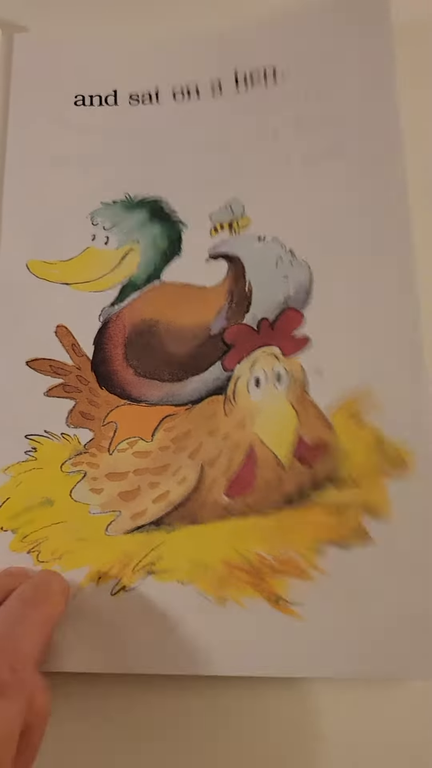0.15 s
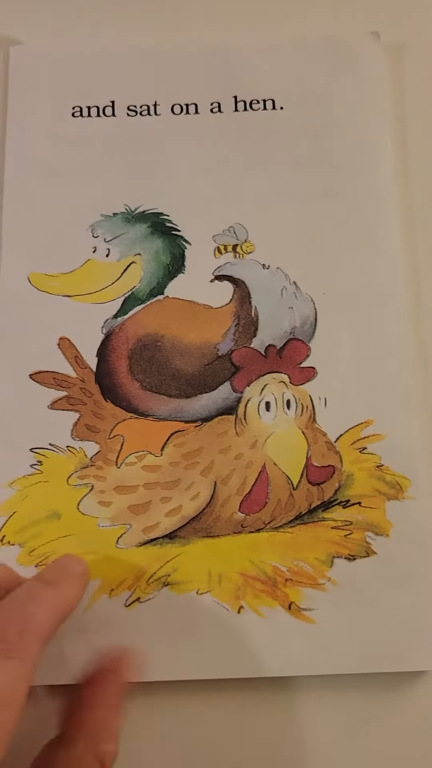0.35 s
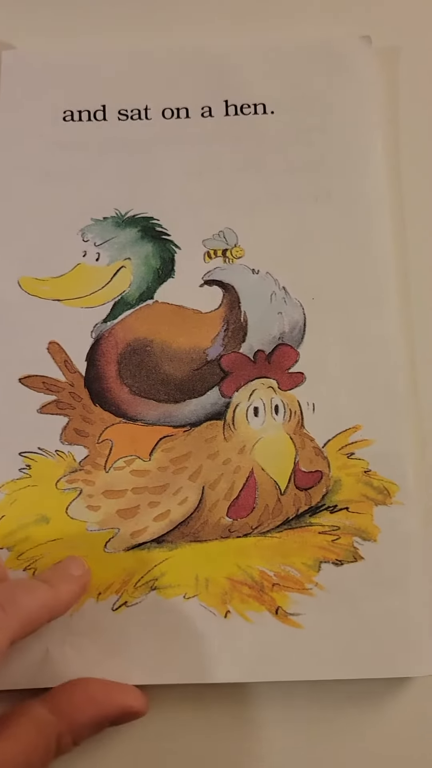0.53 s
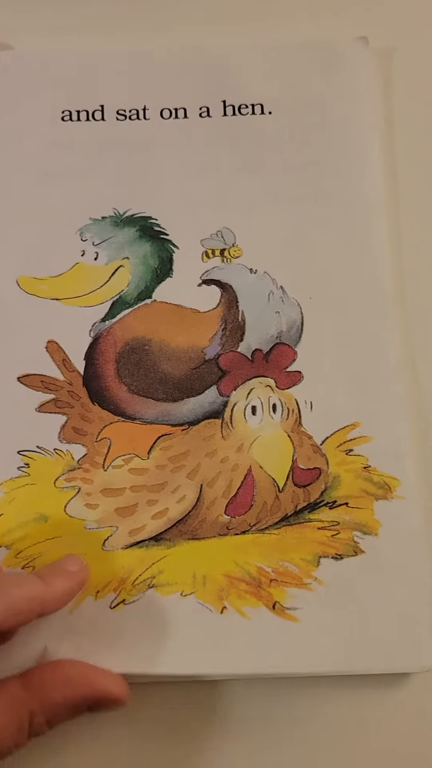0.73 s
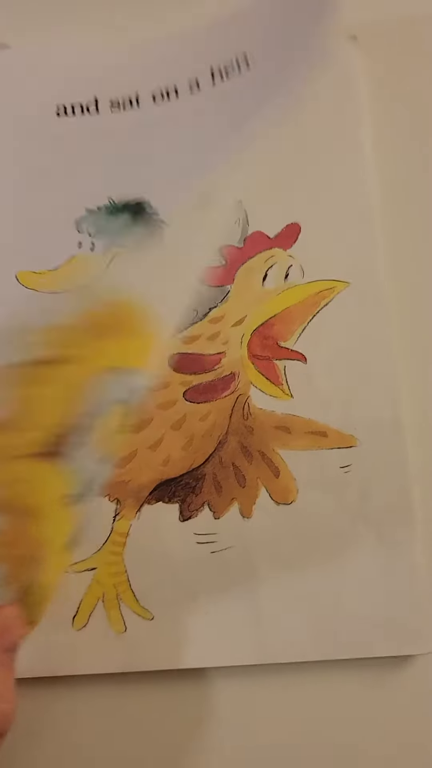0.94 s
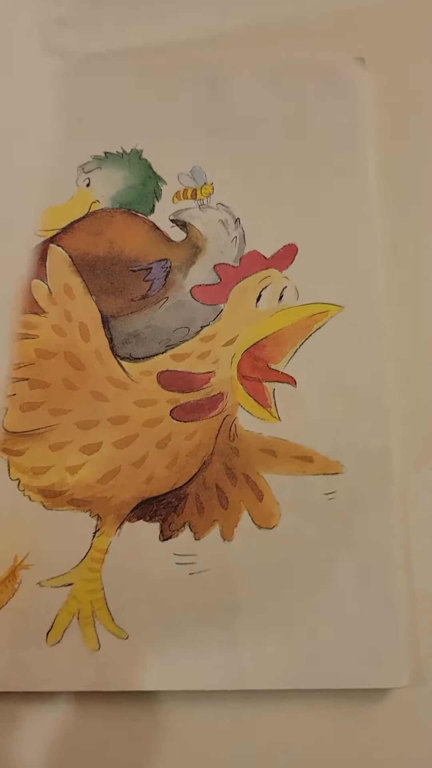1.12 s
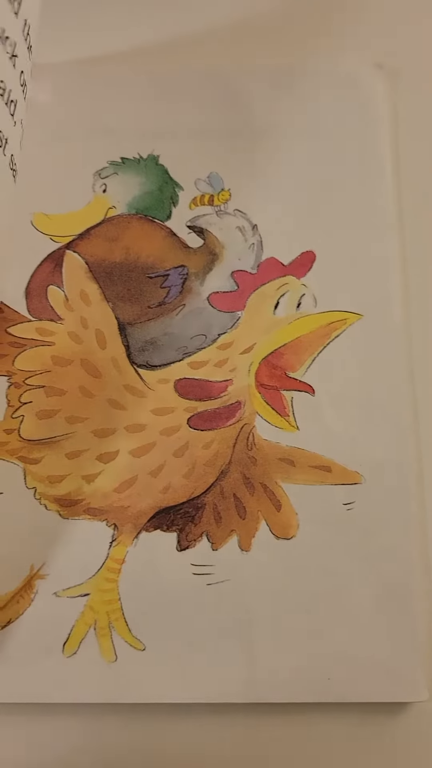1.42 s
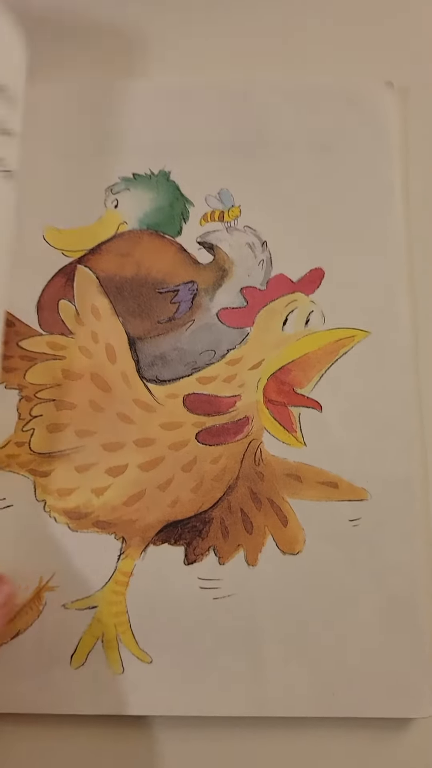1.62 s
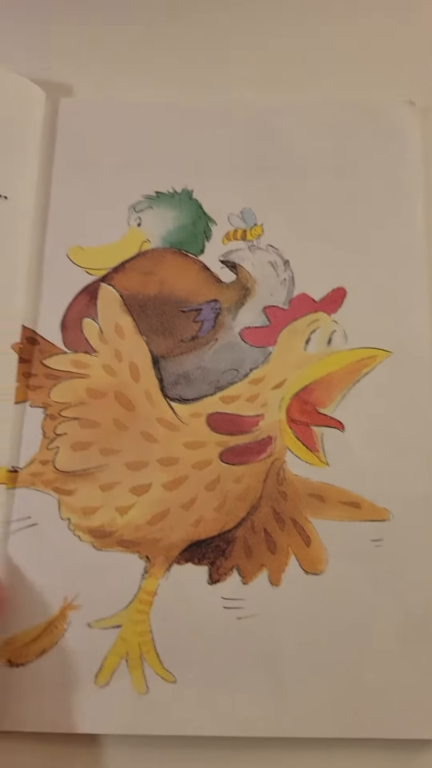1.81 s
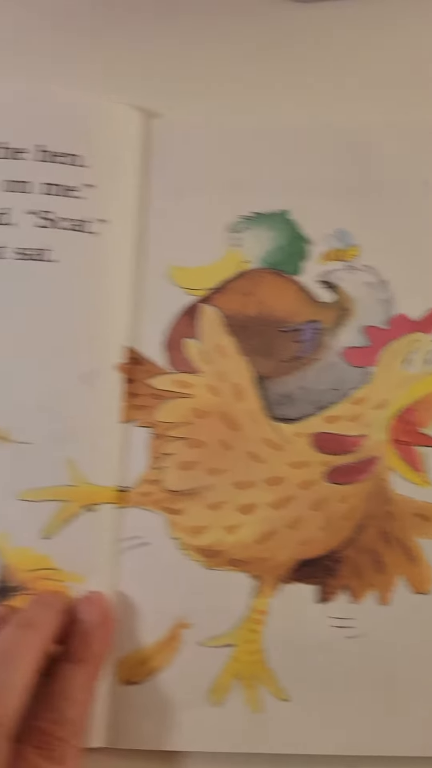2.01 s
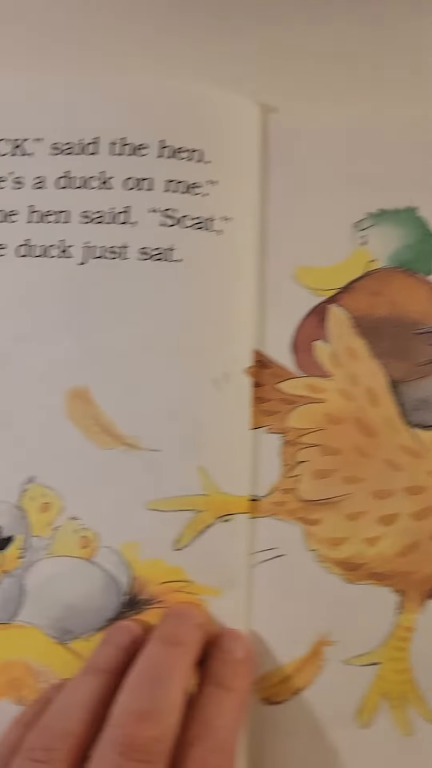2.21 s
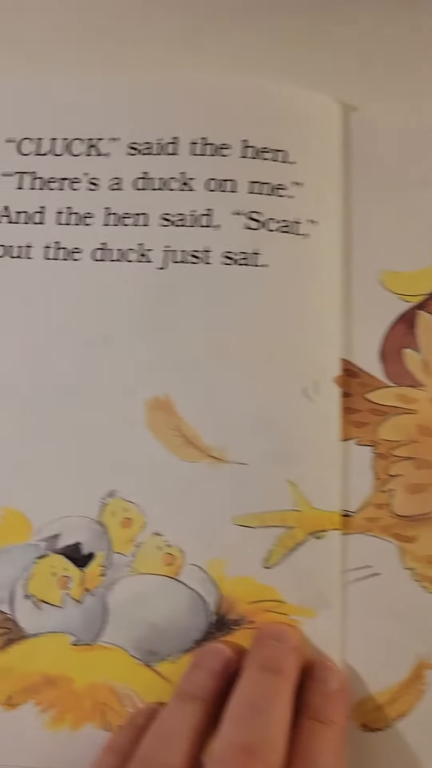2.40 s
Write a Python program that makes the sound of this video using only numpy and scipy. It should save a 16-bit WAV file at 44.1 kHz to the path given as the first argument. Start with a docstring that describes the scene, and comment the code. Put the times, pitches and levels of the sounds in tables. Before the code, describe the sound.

Close stereo page turn in a small room with low rumble: the corner flicks free sharply, paper slides and buckles, the sheet slaps down on the book, and a few faint taps follow.

```python
"""A stiff page of a picture book is turned by hand, close to the microphone in a small quiet room.
The corner snaps free and the sheet rings; the page lands in a run of slaps and the book rings under it.
Bending paper pops in broad bands of noise and knocks in short dying tones.
Rubbing and sliding are tiny grains mixed with hiss. Echoes and a short tail make the room;
low rumble and faint hiss lie behind it all."""
import sys
import numpy as np
from scipy import signal
from scipy.fft import rfft, irfft
from scipy.io import wavfile
from scipy.ndimage import uniform_filter1d

SR = 44100
rng = np.random.default_rng(int(sys.argv[2]) if len(sys.argv) > 2 else 0)


def dump_mix(stems):
    """Bounce the given channels to the path in sys.argv[1] as a 16-bit WAV at rate SR."""
    frames = np.atleast_2d(stems).T  # one column per channel
    limited = np.clip(frames, -1, 1)  # hard clip at full scale
    pcm = np.round(limited * 32767).astype(np.int16)
    wavfile.write(sys.argv[1], SR, pcm)


N = 112454  # length of the sound in samples
HZ = np.fft.rfftfreq(4096, 1 / SR)  # frequencies at which the short pulses are shaped


def amp(db):
    """Turns decibels into a gain."""
    return 10 ** (np.asarray(db) / 20)


def unit(x):
    """Scales a sound to an average energy of 1 per channel."""
    channels = len(np.atleast_2d(x))
    return x / np.sqrt(np.sum(x ** 2) / channels + 1e-20)


def read(points, hz):
    """Reads a table between its points, with pitch on a log scale."""
    f, value = np.transpose(points)
    return np.interp(np.log(hz + 1), np.log(f + 1), value)


def add(mix, s, sound):
    """Mixes a stereo sound in at time s, cut off at the end of the mix."""
    part = mix[:, max(round(s * SR), 0):][:, :sound.shape[1]]
    part += sound[:, :part.shape[1]]


def sides(pan_db):
    """Gains for left and right; a positive value makes the left louder."""
    return amp([[pan_db / 2], [-pan_db / 2]])


def causal(db):
    """Makes a pulse with this spectrum and its energy as early as possible (minimum phase)."""
    cepstrum = irfft(np.log(amp(np.maximum(db - db.max(), -90))))
    half = len(cepstrum) // 2
    # fold the backward half onto the forward half
    cepstrum[1:half] *= 2
    cepstrum[half + 1:] = 0
    return unit(irfft(np.exp(rfft(cepstrum)))[:half])


def through(x, response):
    """Passes a sound through a response, by convolution along time."""
    return signal.fftconvolve(np.atleast_2d(x), np.atleast_2d(response), axes=1)


def dying(t, t60):
    """Exponential decay that falls by 60 dB in t60 seconds."""
    return np.exp(-np.log(1000) * t / np.maximum(t60, 1e-4))


def ringing(modes):
    """Dying tones; the higher they are, the more their phase may differ between left and right."""
    t = np.arange(SR // 2) / SR
    total = 0
    for hz, db, t60 in modes:
        phase = rng.random() + min(hz / 2000, 1) * rng.random((2, 1))
        tone = np.sin(2 * np.pi * (hz * t + phase))
        total = total + amp(db) * unit(dying(t, t60) * tone)
    return total


def flutter(length_s):
    """Dense paper ringing: a dying noise burst, evened out in spectrum, alike on both sides in the bass."""
    mono_below_hz = 310  # around here the likeness has dropped to half
    t = np.arange(len(HZ) * 2) / SR
    z = rfft(rng.standard_normal((2, len(t))))
    same = 1 / (1 + (np.fft.rfftfreq(len(t), 1 / SR) / mono_below_hz) ** 2)
    z[1] = same * z[0] + np.sqrt(1 - same ** 2) * z[1]
    burst = irfft(z) * dying(t, length_s)
    for _ in range(2):
        even = irfft(np.exp(1j * np.angle(rfft(burst))))  # keep the phases, flatten the spectrum
        burst = even * dying(t, 2 * length_s)
    return unit(burst)


def snap(pulse, db, ring_s, pan_db, lag_s, click_db):
    """One sudden release: a click and the sheet's short ringing, arriving on the left first."""
    burst = amp(1) * flutter(ring_s)  # ringing raised by 1 dB
    burst[:, 0] += amp(click_db) * np.exp(-ring_s / 0.038)  # a longer ring has a weaker click
    left, right = through(burst, pulse)
    late_right = np.roll(right, round(abs(lag_s) * SR))
    sound = np.array([unit(left), unit(late_right)])
    return amp(db) * unit(sound * sides(pan_db))


# The corner snapping free: (time [s], level [dB], ring length setting [s], left over right [dB])
CORNER_SNAPS = [(.249, 7.5, 0.0099, 2), (0.2523, 11.5, 0.018, -4.5), (0.2562, 6, 0.008, -4),
                (0.2716, -4, .005, -1.5)]
# Tone colour of those snaps: (frequency [Hz], level [dB])
CORNER_COLOUR = [(60, -49.5), (120, -37), (300, -26.5), (600, -28.5), (830, -17), (1100, -8), (1250, -12),
                 (1800, -9.5), (2100, -11), (2600, -1.5), (3200, -10), (4500, -11), (7900, -14.5),
                 (10700, -27.5), (13200, -24.5), (16000, -33)]
# Tones of the flicked sheet: (frequency [Hz], level [dB], time to fall 60 dB [s])
SHEET_TONES = [(1260, -6, 0.11), (1508, -3, 0.05), (2285, -4, 0.033), (2613, 1, 0.054), (3460, -1.5, 0.074)]


def corner():
    """The corner slips off the finger in a few snaps, and the sheet rings from the first one."""
    out = np.zeros((2, N))
    pulse = causal(read(CORNER_COLOUR, HZ))
    for s, db, ring_s, pan_db in CORNER_SNAPS:
        add(out, s, snap(pulse, db, ring_s, pan_db, lag_s=.00042, click_db=-5.5))
    add(out, CORNER_SNAPS[0][0], ringing(SHEET_TONES))
    return out


# The page landing, first its belly, then its edge in a run of crackles:
# (time [s], level [dB], ring length setting [s], left over right [dB])
PAGE_SLAPS = [(1.6359, -5.5, 0.007, 4), (1.6397, 0, 0.0055, 0.5), (1.6452, -1, 0.0074, 0.5),
              (1.648, 2.5, 0.016, 4.5), (1.6543, 2, .012, -0.5), (1.6605, -0.5, .02, -3.5),
              (1.6662, -2, .016, -1.5), (1.6734, -3, .018, 0.5), (1.678, -5.5, .02, -1.5),
              (1.6845, -8, .04, 0), (1.703, -14.5, 0.03, -2), (1.716, -26, 0.04, -7)]
# Tone colour of the slaps: (frequency [Hz], level [dB])
PAGE_SLAP_COLOUR = [(30, -25.5), (60, -6.5), (130, -1), (200, -8), (300, -2.5), (395, -9), (500, -1),
                    (800, 1), (1350, -0.5), (1900, -3), (2300, -12), (3300, -10.5), (4500, -23.5),
                    (7500, -25.5), (11000, -39.5), (14000, -35), (16000, -39.5)]
# Tones of the open book under the slap: (frequency [Hz], level [dB], time to fall 60 dB [s])
BOOK_TONES = [(295, -8, 0.0905), (443.8, -11, 0.13), (866, -14, .16), (1105, -6, 0.11), (1435, -1.5, 0.13),
              (1824, 1.5, 0.13), (2420, -9.5, .12), (3380, -7, 0.05)]


def landing():
    """The page meets the stack in a quick run of slaps, and the book rings from the fourth one."""
    out = np.zeros((2, N))
    pulse = causal(read(PAGE_SLAP_COLOUR, HZ))
    for s, db, ring_s, pan_db in PAGE_SLAPS:
        add(out, s, snap(pulse, db, ring_s, pan_db, lag_s=.00003, click_db=-0.5))
    add(out, PAGE_SLAPS[3][0], ringing(BOOK_TONES))
    return out


PAPER_LAG_S = .00032  # how much later pops and slides reach the right side

# The paper buckling and being tapped:
# (time [s], level [dB], low edge [Hz], high edge [Hz], fall below [dB/octave], fall above [dB/octave],
#  ring length setting [s], left over right [dB])
PAPER_POPS = [(.1145, -19, 600, 1300, 2, 12, 0.009, 9), (0.123, -21, 270, 400, 4, 8, 0.02, 2.5),
              (0.144, -18.5, 230, 300, 5, 10, 0.022, 6), (0.164, -23, 100, 200, -2.5, 5.5, 0.02, 0),
              (0.52, -20, 1500, 2200, 1.5, 42, 0.0025, 3), (0.645, -26.5, 1050, 1600, 28, 14, 0.06, 8),
              (0.74, -31, 650, 1000, 14, 10.5, 0.06, 7), (0.849, -36, 1100, 1300, 48, 45, 0.031, 22),
              (1.114, -5.5, 700, 1300, 9, 7.5, 0.009, 1.5), (1.127, -14, 420, 900, 10, 4.5, 0.06, 3),
              (1.161, -11.5, 380, 750, 5, 7, 0.015, -2.5), (1.2095, -6, 1250, 1500, 3, 7.5, .006, 5),
              (1.239, -20, 900, 1600, 1, 8, 0.01, -2), (1.2611, -19, 1400, 2600, 2, 11, 0.0025, -1),
              (1.3066, -22, 613, 830, 6, 7, .007, 4), (1.417, -29, 1050, 1250, 22, 8, 0.1, 3.5),
              (1.652, 8, 2950, 3600, 15, 22, 0.014, -0.5), (1.712, -17, 200, 300, 12, 20, .06, 0),
              (1.816, -23, 280, 350, 11.5, 12, 0.03, -6.5), (2.111, -14, 1700, 3600, 1, 22, 0.001, 1),
              (2.1124, -15, 597, 2000, -0.5, 14.5, 0.0055, -4), (2.3129, -30, 1700, 2600, 3, 7, 0.004, 2)]
# Tone colour shared by the pops: (frequency [Hz], level [dB])
PAPER_POP_COLOUR = [(40, -4), (150, 3.5), (600, 0), (1500, 4.5), (3000, 4.5), (4500, -2), (7500, 3),
                    (10500, -2.5), (13500, -0.5), (16000, -1.5)]


def pops():
    """Each buckle or tap of the paper rings in a broad band of its own."""
    out = np.zeros((2, N))
    for s, db, low_hz, high_hz, below, above, ring_s, pan_db in PAPER_POPS:
        octaves_below = np.maximum(np.log2(low_hz / (HZ + 10)), 0)
        octaves_above = np.maximum(np.log2((HZ + 10) / high_hz), 0)
        fall = below * octaves_below + above * octaves_above
        pulse = causal(read(PAPER_POP_COLOUR, HZ) - fall)
        add(out, s, snap(pulse, db, ring_s, pan_db, PAPER_LAG_S, click_db=3.0))
    return out


# Hollow knocks of the bent sheet:
# (time [s], level [dB], pitch [Hz], time for the tone to fall 60 dB [s], left over right [dB])
SHEET_KNOCKS = [(0.0552, -22, 1297, 0.025, 12), (.9875, -8.5, 1154, 0.0039, 8.5),
                (1.1142, -10.5, 800, 0.019, 3), (2.312, -34.5, 1720, 0.025, -4)]


def knocks():
    """The bent sheet swings for a few dying cycles, with a faint scatter at the same pitch."""
    rise_s, scatter_db = .0004, -16
    out, t = np.zeros((2, N)), np.arange(len(HZ)) / SR
    for s, db, hz, t60, pan_db in SHEET_KNOCKS:
        cycles = np.sin(2 * np.pi * hz * t) * dying(t, t60) * (1 - np.exp(-t / rise_s))
        burst = amp(scatter_db) * flutter(2 * t60)
        burst[:, 0] += 1  # the direct knock
        add(out, s, amp(db) * unit(through(burst, cycles) * sides(pan_db)))
    return out


def wander(x):
    """The colour of a rub shifts in random patches of time and pitch as the contact moves."""
    patch_db = 3  # typical size of the shift
    z = signal.stft(x, nperseg=512)[2]
    field = rng.standard_normal(z.shape[1:])
    field = uniform_filter1d(field, size=6, axis=0)  # smooth over pitch
    field = uniform_filter1d(field, size=4, axis=1)  # smooth over time
    shifted = z * amp(patch_db * field / field.std())
    return signal.istft(shifted, nperseg=512)[1][:, :x.shape[1]]


# Paper sliding on skin and paper:
# (start [s], peak time [s], end [s], level at peak [dB], start level below peak [dB],
#  tilt [dB/octave], scrape pitch [Hz], scrape boost [dB])
PAPER_SLIDES = [(0, 0.08, 0.26, -52.5, 9, -1, 1700, 5), (0.113, 0.145, 0.18, -54, -4, 3.5, 1000, 2),
                (0.18, 0.198, 0.38, -47, 10, -1, 1300, 4), (0.229, .247, 0.35, -36.5, 10, 1.5, 3000, 5),
                (0.638, 0.70, .8, -51, 8, -1, 1150, 7), (0.842, 0.97, 1.06, -49.5, 16, -.5, 1700, 0),
                (1.03, 1.085, 1.135, -47.5, 14, -0.8, 750, 4), (1.118, 1.24, 1.36, -50, -2, -.5, 1300, 2),
                (1.279, 1.316, 1.473, -52.5, 4, 2.5, 750, -0.5),
                (1.454, 1.541, 1.665, -45, 16.5, 0.23, 800, 7),
                (1.722, 1.811, 1.877, -48.5, 3, 3.5, 6500, -2), (1.839, 1.939, 1.98, -62, 4, 2, 1700, 6),
                (1.962, 2.09, 2.15, -60, 8, -3.5, 1200, 4)]
# Tone colour shared by the slides: (frequency [Hz], level [dB])
PAPER_SLIDE_COLOUR = [(250, -12.5), (400, -11), (600, -8.5), (900, -5), (1500, 2.5), (2100, -5),
                      (2900, -3.5), (4600, -11), (7500, -9.5), (10700, -20.5), (13500, -21.5),
                      (16000, -19.5)]


def slides():
    """Fibres catch and slip in tiny grains, mixed with hiss, while a stroke changes level and dies."""
    grains_per_s, grain_spread_db, hiss_share = 2000, 4, 1
    release_db, touch_s = 26, 0.006  # drop from peak to end; fade-in at first contact
    scrape_octaves, bass_cut_hz = 0.25, 170
    out, t = np.zeros((2, N)), np.arange(SR // 2) / SR
    octave = np.log2(HZ + 10)
    for start, peak, end, db, rise_db, tilt, scrape_hz, scrape_db in PAPER_SLIDES:
        # grains at random moments, mostly small, pushing either way
        sizes = amp(grain_spread_db * np.minimum(rng.exponential(1, len(t)), 5))
        hits = rng.random(len(t)) < grains_per_s / SR
        grains = hits * rng.choice([-1, 1], len(t)) * sizes
        late_grains = np.roll(grains, round(PAPER_LAG_S * SR))
        hiss = unit(rng.standard_normal((2, len(t))))
        drive = unit(np.array([grains, late_grains])) + hiss_share * hiss

        colour = read(PAPER_SLIDE_COLOUR, HZ) + tilt * octave
        colour -= 12 * np.maximum(np.log2(bass_cut_hz) - octave, 0)  # bass falls 12 dB per octave
        colour += scrape_db * np.exp(-((octave - np.log2(scrape_hz)) / scrape_octaves) ** 2)
        rub = wander(through(drive, causal(colour))[:, :len(t)])

        now = start + t
        stroke_db = np.interp(now, [start, peak, end], [-rise_db, 0, -release_db])
        level = amp(db + stroke_db) * (now < end) * np.minimum(t / touch_s, 1)
        add(out, start, level * unit(rub) * np.sqrt(len(t)))
    return out * sides(1.2)


# Near surfaces: (delay [s], level [dB])
NEAR_ECHOES = [(.0034, -9.5), (.0075, -19), (.013, -19), (.023, -20)]
# How long the room rings: (frequency [Hz], time to fall 60 dB [s])
TAIL_TIMES = [(100, .35), (300, .35), (600, .27), (1200, .28), (3000, .26), (8000, .245), (16000, .21)]
# How loud the room rings: (frequency [Hz], level [dB])
TAIL_LEVELS = [(100, -10.5), (200, -8.5), (300, -3.5), (600, -6), (1000, -8), (3000, -7.5), (8000, -5.5),
               (16000, -9.5)]
# Low resonances of the room: (frequency [Hz], level [dB], time to fall 60 dB [s])
ROOM_TONES = [(293, -32.5, .34), (328, -34, .28)]


def room(x):
    """Echoes from table and body, early scatter, low tones and the short tail of a small room."""
    early_db, early_t60 = -6, .07
    t = np.arange(SR // 2) / SR
    # the tail: noise that dies at its own pace at each pitch
    hz, when, z = signal.stft(rng.standard_normal((2, len(t))), SR, nperseg=256)
    t60 = np.maximum(read(TAIL_TIMES, hz), .02)[:, None]
    even_energy = np.sqrt(2 * np.log(1000) / (t60 * SR))  # long and short tails carry equal energy
    z = z * dying(when, t60) * amp(read(TAIL_LEVELS, hz))[:, None] * even_energy
    tail = signal.istft(z, SR, nperseg=256)[1][:, :len(t)]
    response = tail * np.minimum(t / 0.028, 1)

    scatter = rng.standard_normal((2, len(t))) * dying(t, early_t60) * np.minimum(t / 0.0057, 1)
    response += amp(early_db) * unit(scatter)
    response += ringing(ROOM_TONES)
    response[:, 0] += 1  # the direct sound
    for delay, db in NEAR_ECHOES:
        for side in response:
            shifted = delay + rng.uniform(-.0003, .0003)  # slightly different on each side
            side[int(abs(shifted) * SR)] += amp(db)
    return through(x, response)[:, :N]


# Tone colour of the background: (frequency [Hz], relative level [dB])
FLOOR_COLOUR = [(15, -43.5), (30, -23), (45, -2), (66, 1.5), (82, -2), (105, -1), (150, -13), (200, -20.5),
                (330, -24.5), (500, -23.5), (800, -38.5), (1500, -35.5), (3000, -39.5), (6000, -46.5),
                (12000, -45), (16000, -49)]
# How alike left and right are: (frequency [Hz], likeness [0 to 1])
FLOOR_LIKENESS = [(30, 0.75), (150, 0.98), (500, 0.25), (2000, 0.092)]


def floor():
    """Low rumble of the house and a faint hiss: steady noise shaped by pitch."""
    floor_db = -60  # average (RMS) level
    hz = np.fft.rfftfreq(N, 1 / SR)
    a, b = rfft(rng.standard_normal((2, N)))
    same = np.clip(read(FLOOR_LIKENESS, hz), -1, 1)
    right = same * a + np.sqrt(1 - same ** 2) * b
    z = np.array([a, right]) * amp(read(FLOOR_COLOUR, hz))
    return amp(floor_db) * np.sqrt(N) * unit(irfft(z, N))


def scene():
    """All the paper sounds in the room, over the background."""
    paper = corner() + landing() + pops() + knocks() + slides()
    return room(paper) + floor()


def record(dry):
    """Rounds off the loudest peaks, then removes the treble above the band edge."""
    edge_hz = 16200
    held = dry / (1 + (dry / .88) ** 4) ** .25  # stays below 0.88
    lowpass = signal.firwin(511, edge_hz, window=("kaiser", 9), fs=SR)
    return signal.oaconvolve(held, lowpass[None], "same")


dry = scene()
out = record(dry)
dump_mix(out)
```